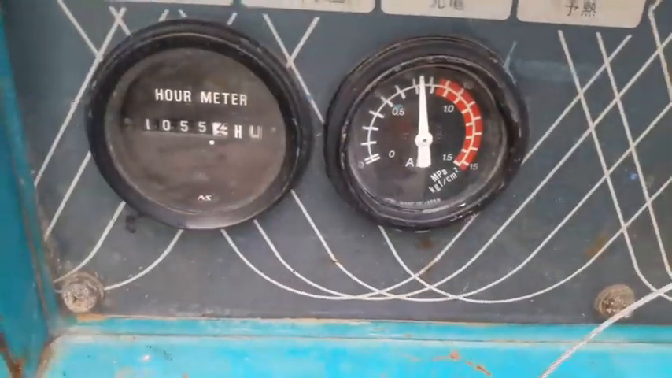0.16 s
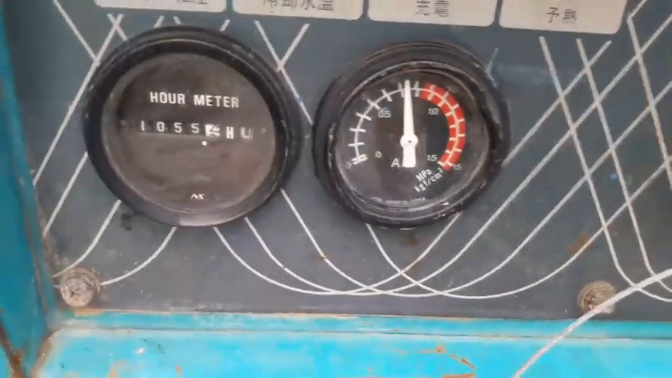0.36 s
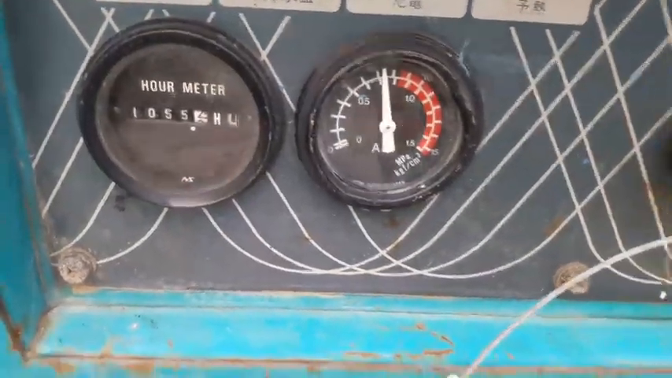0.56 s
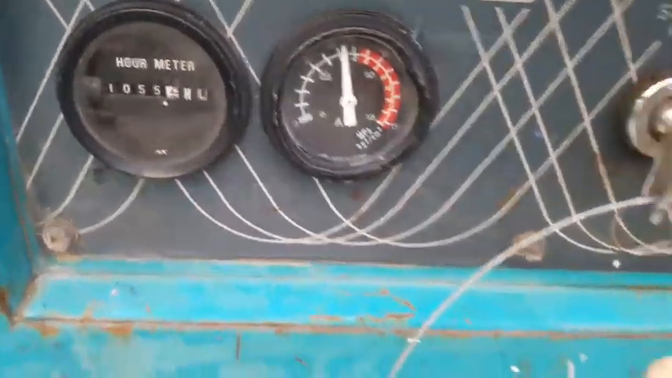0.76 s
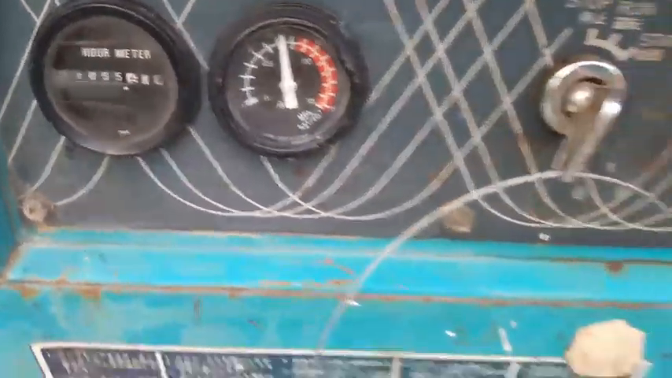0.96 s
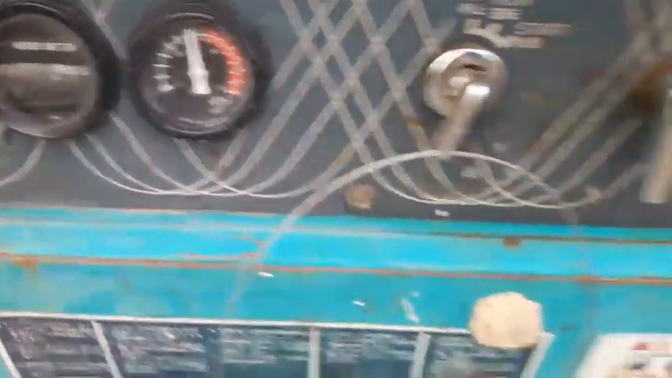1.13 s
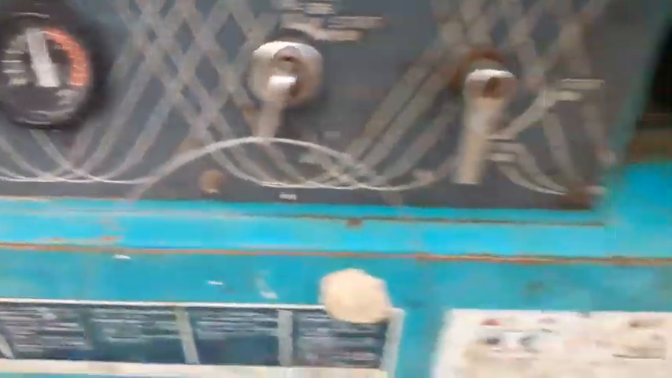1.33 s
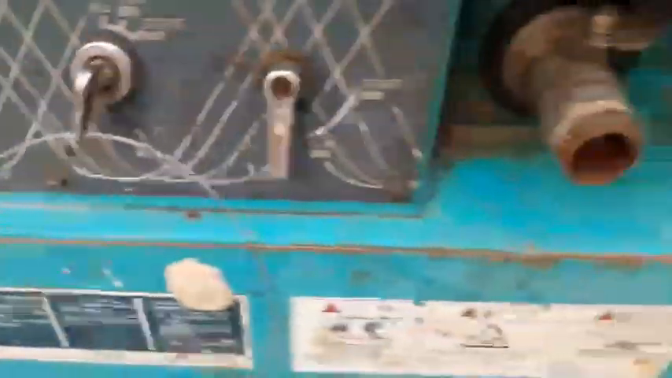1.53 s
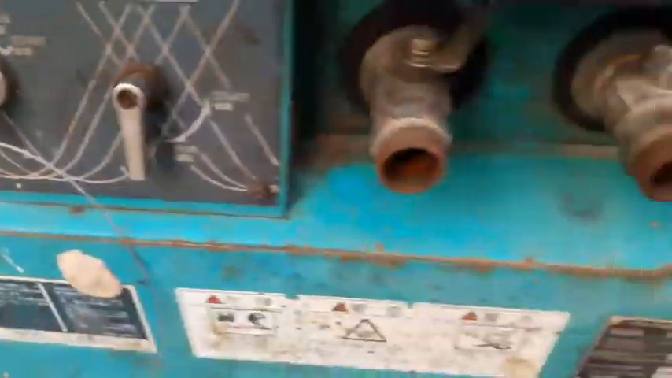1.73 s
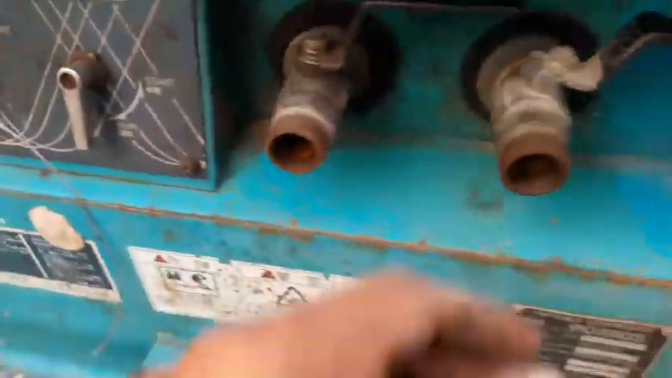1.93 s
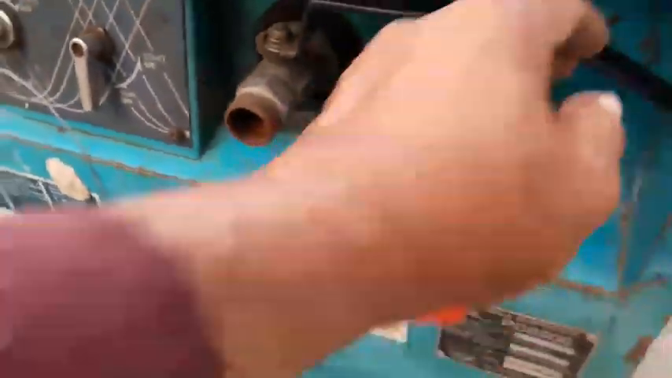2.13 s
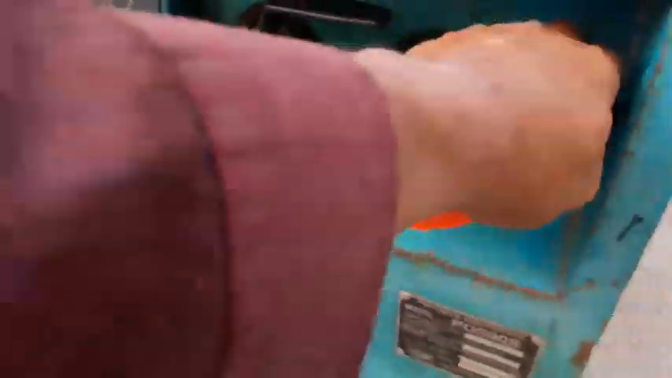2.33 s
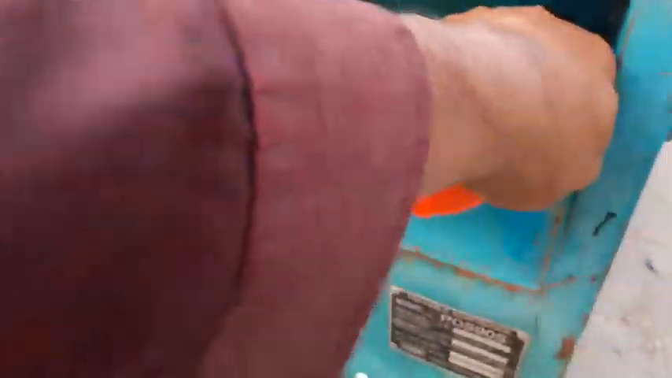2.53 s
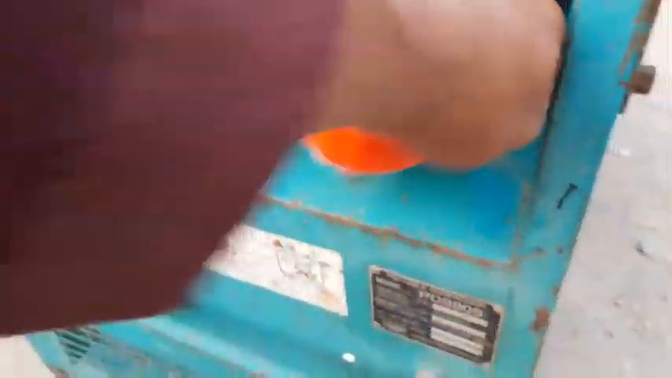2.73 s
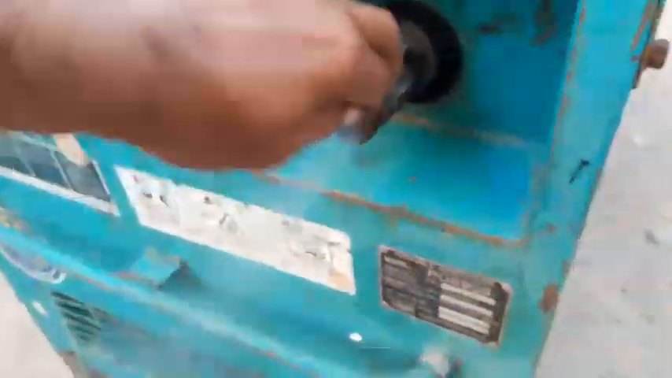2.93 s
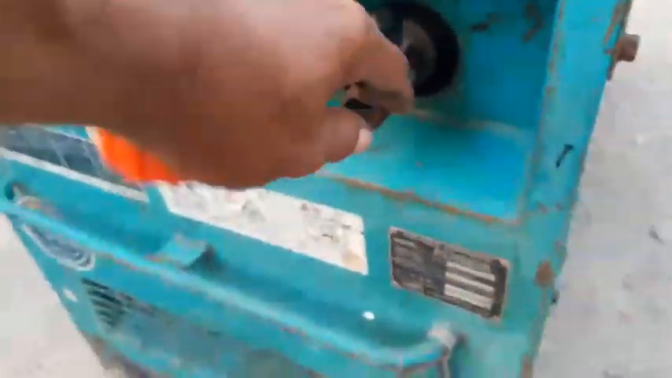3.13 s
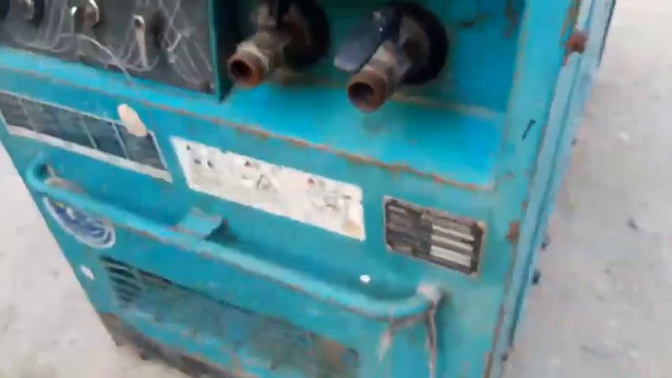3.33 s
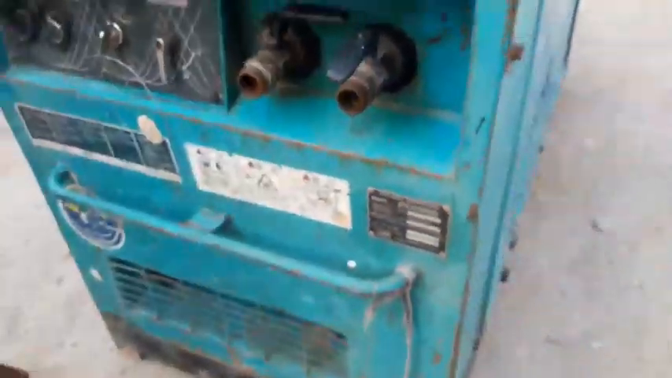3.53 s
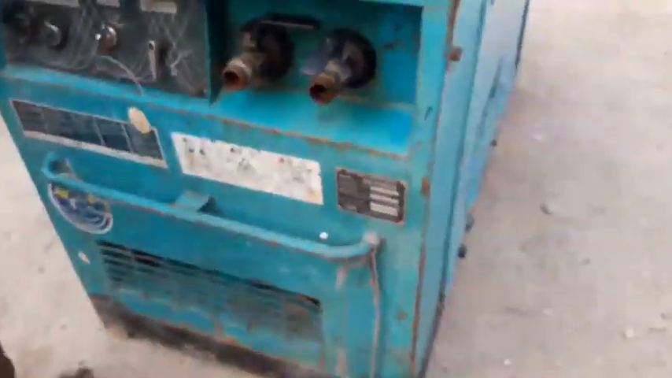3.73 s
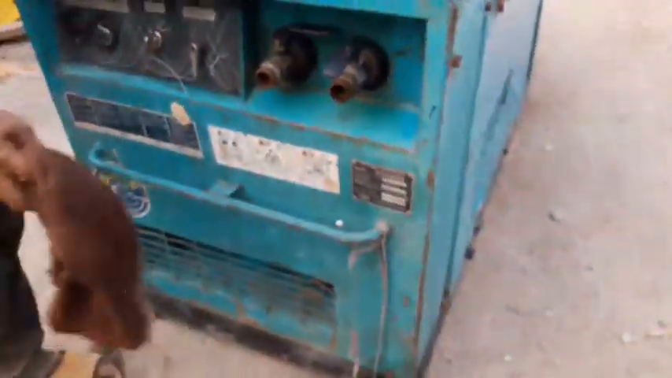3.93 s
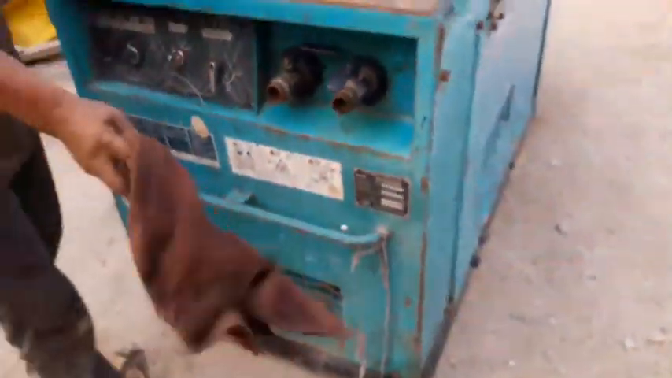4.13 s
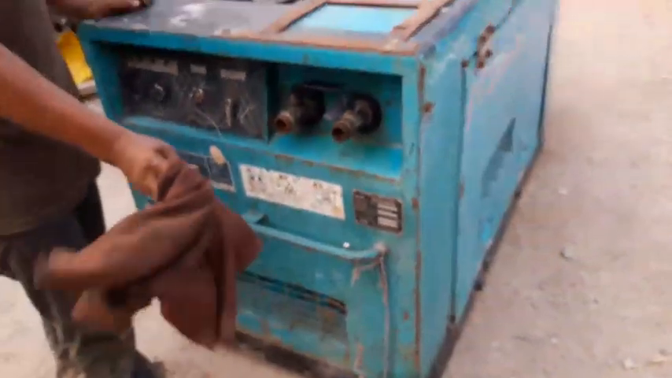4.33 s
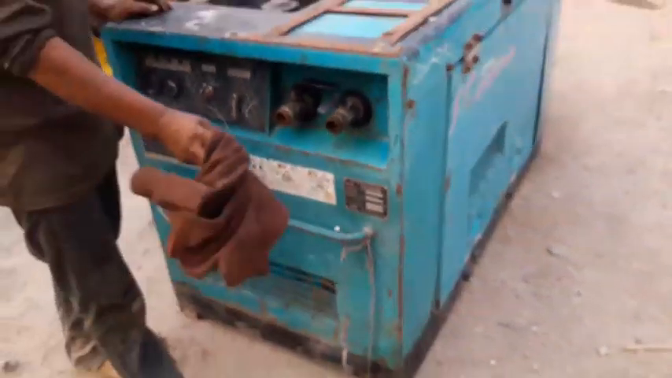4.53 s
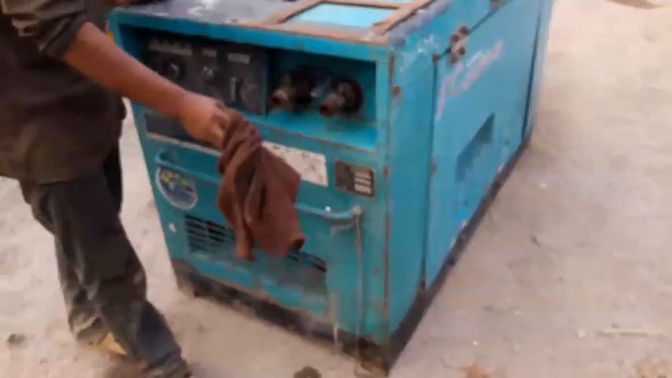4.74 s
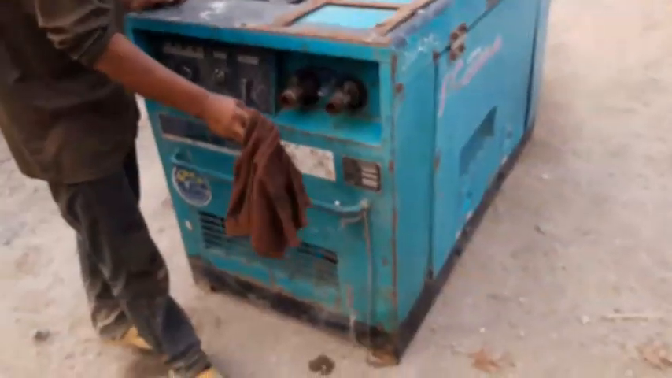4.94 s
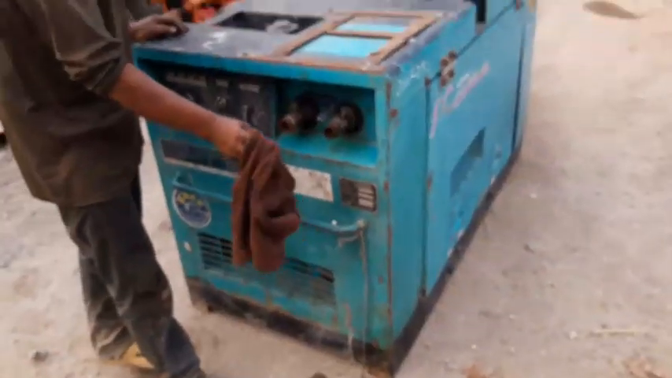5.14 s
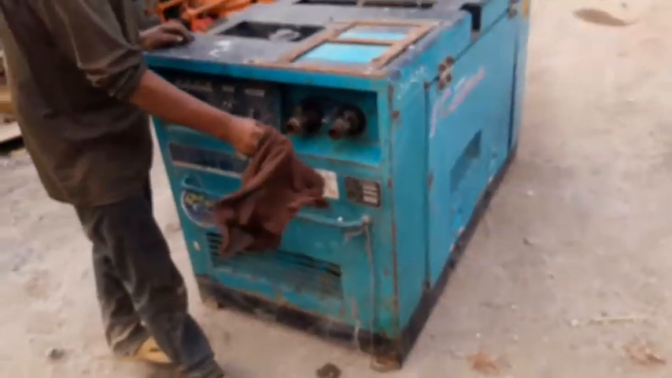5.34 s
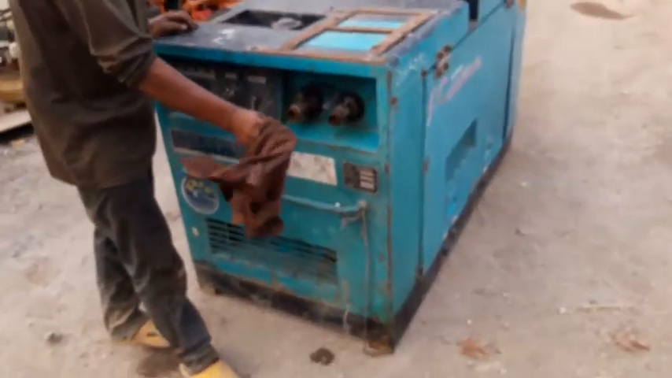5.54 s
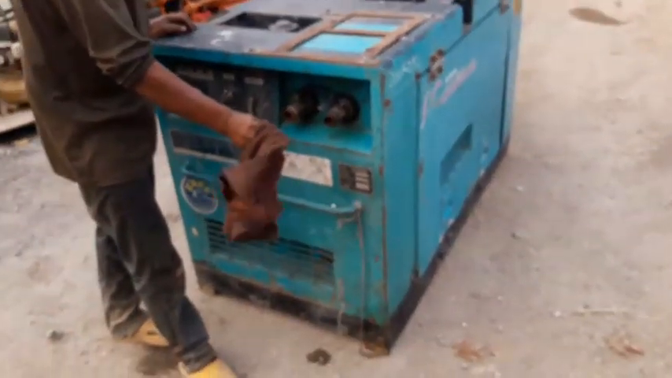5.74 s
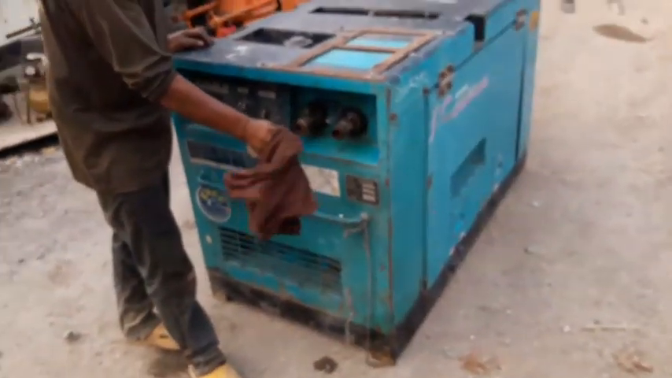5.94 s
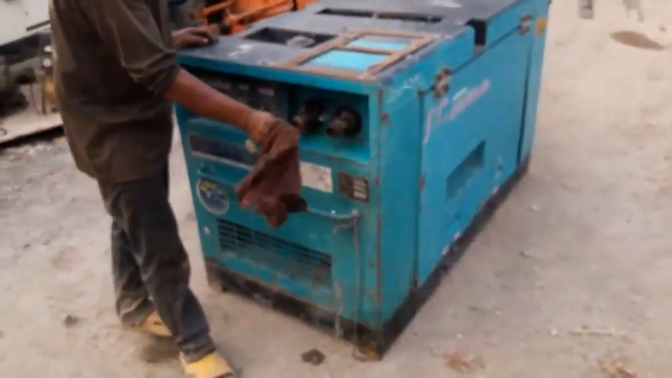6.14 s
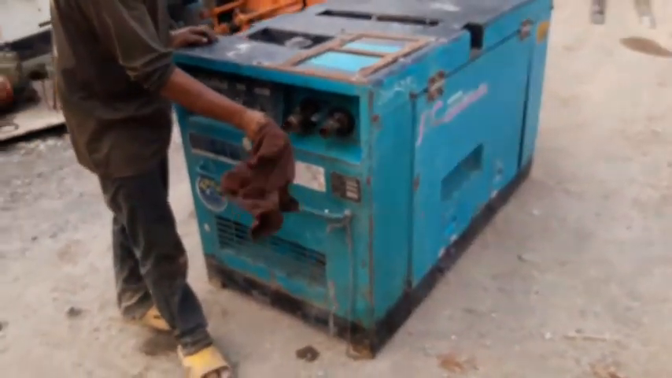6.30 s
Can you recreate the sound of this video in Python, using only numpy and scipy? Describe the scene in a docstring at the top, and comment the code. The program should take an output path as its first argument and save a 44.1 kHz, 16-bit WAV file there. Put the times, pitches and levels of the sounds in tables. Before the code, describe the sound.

Outdoors, a hand-held microphone close to a small diesel compressor: low, fast, throbbing idle with metallic clatter and growling panels. A few light scuffs come near the valves, then a short thin hiss. At about three seconds a valve opens and a loud broadband air jet takes over abruptly, pulsing rapidly with the engine, its tone dulling as the microphone backs away.

```python
"""A three-cylinder diesel compressor idles outdoors, close to a hand-held microphone: tones locked to the
engine cycle, ringing casing and block, clatter and rumble of filtered noise. Scuffs near the air valves and
a short seep of air come before a valve is thrown open. The idle drops away abruptly as the jet starts, noise
that throbs with each firing; the engine runs faster under load, with two exhaust tones, gritty valve gear
and a squeak per firing from a small leak. The microphone backs away, which changes the colour of the jet."""
import sys
import numpy as np
from scipy import signal
from scipy.io import wavfile
from scipy.ndimage import uniform_filter1d

SR = 44100
rng = np.random.default_rng(int(sys.argv[2]) if len(sys.argv) > 2 else 0)


def digitize_waveform(pressure):
    """Quantize a signal to 16-bit integers and store it at the path in sys.argv[1].

    Rows of a 2-D input are taken as channels; values are limited to [-1, 1].
    """
    field = np.atleast_2d(pressure).T
    bounded = np.clip(field, -1, 1)
    quanta = np.round(bounded * 32767).astype(np.int16)
    wavfile.write(sys.argv[1], SR, quanta)


N = 280917

# Levels inside a table of tones, modes or noise colour are relative: each layer is levelled afterwards.
# Exhaust at idle, multiples of three are the firings: cycle_multiple, level_db
EXHAUST_TONES = [(3, -49.5), (4, -38), (6, 0.5), (7, -39), (8, -32), (9, -2.5), (10, -36), (11, -30.5),
                 (12, -17.5), (13, -31), (14, -38.5), (15, -13), (16, -24.5), (17, -23), (18, -27),
                 (19, -23), (21, -17.5), (23, -34), (24, -31.5), (25, -24.5), (27, -24.5), (28, -28),
                 (29, -33.5), (30, -28.5), (31, -32.5), (32, -34.5), (33, -38.5), (34, -34), (36, -28),
                 (38, -34), (39, -37.5), (42, -26.5), (43, -37.5), (44, -39), (45, -29)]
# Fan and casing: frequency_hz, density_db_per_hz
RUMBLE_COLOUR = [(15, -58), (25, -18.5), (48, -23.5), (94, -7.5), (134, -16.5), (162, -8.5), (202, -12.5),
                 (394, -19), (565, -17.5), (648, -21.5), (1500, -34), (1950, -73.5), (3300, -120)]
# Panels that growl: pitch_hz (before the cylinder's factor), level_db, t60_s, change_db towards the valves
CASING_MODES = [(561, -2.5, 0.047, 1.5), (698, 3.5, 0.076, -10.5), (853, 0.5, 0.075, 0),
                (979, 0, 0.044, -2.5), (1106, -6, .04, -1)]
# Block rung by combustion: pitch_hz (before the cylinder's factor), level_db, t60_s, change_db to the valves
BLOCK_MODES = [(1725, 0, .034, 1.5), (1900, -16, .03, 3), (2050, -15, .03, 3), (3480, -10, .035, 1.5),
               (3900, -15, .025, 1.5)]
# Valve gear and injectors: frequency_hz, density_db_per_hz
CLATTER_COLOUR = [(600, -30), (950, -13), (1270, -17), (1700, -10.5), (2050, -16.5), (2300, -21.5),
                  (3000, -22), (3700, -17), (4600, -29), (5500, -30), (7060, -18.5), (7480, -24),
                  (8020, -37.5), (9760, -42), (14300, -48)]
# One row a cylinder: growl_db, knock_db, clatter_db, pitch_factor of what rings
CYLINDERS = [(-1, -9, 2, 1.03), (0, 0, 4, 1.015), (0, 0, 4, .975)]
# The microphone moves along the machine: time_s, place (0 at the gauges, 1 at the valves)
PLACE = [(0, 0.01), (1.2, 0.15), (1.9, 0.39), (2.5, 1), (2.95, 1.2)]
# Rows exhaust, upper firing tones, tones between them, rumble, growl, knock, clatter:
# at_gauges_db, at_valves_db
IDLE_LEVELS = [(-7.5, -7.1), (2.5, 1.4), (1.1, 5.5), (-27, -32.5), (-34, -37), (-38.5, -36), (-38.5, -34)]
# Short scuffs and rattles near the valves: start_s, level_db (before the soft start)
SCUFF_TIMES = [(0.5881, -34), (0.8205, -35), (1.278, -32), (1.8183, -32), (1.9366, -24.5), (1.9694, -37),
               (2.0477, -34), (2.2463, -23.5), (2.5436, -32), (2.585, -28), (2.6204, -28), (2.6983, -27.5),
               (2.7414, -24), (2.8519, -28)]
# Scuffs: frequency_hz, density_db_per_hz
SCUFF_COLOUR = [(880, -40), (1500, -18.5), (1830, -8.5), (2400, -9), (3510, -3), (4650, -16.5), (6980, 0.5),
                (8200, -23), (12300, -42), (14300, -46.5)]
# Air seeping out: frequency_hz, density_db_per_hz
SEEP_COLOUR = [(2000, -40), (3500, 8), (5000, -7), (7000, 5), (8200, -12), (11000, -16), (14300, -20)]
# Jet before throb and gusts: time_s, level_db
JET_LEVEL = [(2.95, -11), (3.0, -13), (3.07, -13), (3.3, -15), (3.6, -13.5), (4.3, -12), (4.7, -12.9),
             (5.3, -13), (5.72, -13), (6.0, -12.8), (6.37, -13.5)]
# Jet close by: frequency_hz, density_db_per_hz
NEAR_COLOUR = [(25, -45), (60, -13), (140, 3), (320, 2), (800, 2), (2300, 1), (4500, -4), (6000, -7),
               (7200, -4.5), (8050, -14), (9200, -8), (10700, -6.5), (12500, -2.5), (14250, -7.5)]
# Jet from further off: frequency_hz, density_db_per_hz
FAR_COLOUR = [(25, -44), (60, -18), (140, -1), (600, -1), (2500, -4.5), (4500, -7.5), (5800, -13),
              (6900, -8), (7400, -9), (8100, -18.5), (9600, -9.5), (11000, -16), (13300, -14.5),
              (14250, -13.5)]
# The microphone backs away: time_s, colour (0 near, 1 far)
AWAY = [(2.95, 0.6), (3.1, 0), (3.45, 0.15), (3.7, 0.38), (4.3, 0.85), (5.4, 1), (6.37, 0.83)]
# Engine speed under load: time_s, firings_per_s
LOAD_SPEED = [(3.3, 84), (3.7, 90.7), (3.85, 92.8), (4.15, 93.9), (4.75, 92.9), (5.05, 92), (5.65, 88),
              (6.37, 85.5)]
# Valve gear under load: frequency_hz, density_db_per_hz
GRIT_COLOUR = [(5500, -9.5), (6300, -0.5), (7300, 0), (7900, -28)]
# Width between the two channels: frequency_hz, side_below_mid_db
STEREO_WIDTH = [(3300, -90), (4200, -12), (5500, -9), (7000, -9), (9700, -11), (11500, -5), (14300, -5)]

CYCLE_HZ, CYCLE_START = 12.9713, .0675  # engine cycles a second at idle, cycle position at time zero
KNOCK_RISE_S, KNOCK_LATE_S = .006, .002
SHADE_S, SHADE_DB_PER_S = 2.42, 25  # an arm comes between the block and the microphone
OPEN_S = 2.9525  # the valve opens
FADE_S, FADE_DB = .024, -9  # short fade of the idle, ending as the jet starts
SCUFF_T60_S = .064
# air seeps as the handle starts to turn
SEEP_S, SEEP_DB, SEEP_RISE_DB_PER_S, SEEP_FALL_DB_PER_S = 2.827, -34.5, 91, 130
BITE_NEAR_DB, BITE_FAR_DB = 1, -.85  # the jet around 4.5 kHz
LOAD_S, LOAD_RISE_S, LOAD_FROM_DB, LOAD_DB = 3.55, .4, -47, -31.5  # the engine takes the load
SQUEAK_HZ = 9726  # middle of the glide, before each squeak's own chance
SQUEAK_S, SQUEAK_RISE_DB_PER_S, SQUEAK_DB = 3.7, 170, -24
SQUEAK_FADE_S, SQUEAK_FADE_DB_PER_S = 4.97, 15
UNEVEN_DB, UNEVEN_PER_DB = 3.5, .8  # squeaks differ more from each other as they fade
EDGE_HZ = 14330  # upper band limit


def gain_of(db):
    """Amplitude factor of a level in dB."""
    return 10 ** (np.asarray(db) / 20)


def evened(x):
    """The signal at rms 1."""
    return x / np.sqrt(np.mean(x ** 2) + 1e-20)


def read(points, hz):
    """A colour table read along a logarithmic frequency axis."""
    f, value = np.transpose(points)
    return np.interp(np.log(hz + 1), np.log(f + 1), value)


def columns(rows, t):
    """Every column after the first, read at the times t."""
    s, *rest = np.transpose(rows)
    return [np.interp(t, s, c) for c in rest]


def ramp(t, start_s, length_s):
    """Straight rise from 0 to 1."""
    return np.clip((t - start_s) / length_s, 0, 1)


def wander(hz):
    """Slow chance: straight lines between normal random knots, hz knots a second."""
    knots = rng.standard_normal(int(N / SR * 40) + 4)
    return np.interp(np.arange(N) / SR * np.clip(hz, .1, 40), np.arange(len(knots)), knots)


def noise(colour_db, patchy_db):
    """Random short-time spectra; colour_db(hz, t) gives the shape, patches drift over it."""
    frames, hz = N // 256 + 5, np.fft.rfftfreq(1024, 1 / SR)
    real, imaginary, patches = rng.standard_normal((frames, 513, 3)).T
    patches = uniform_filter1d(patches, size=12, axis=0)
    patches = evened(uniform_filter1d(patches, size=10, axis=1))
    times = np.arange(frames) * 256 / SR
    shape = gain_of(colour_db(hz[:, None], times) + np.zeros(frames))
    shape = shape / np.sqrt((shape ** 2).mean(0))
    spectra = (real + 1j * imaginary) * shape * gain_of(patchy_db * patches)
    return evened(signal.istft(spectra, nperseg=1024, noverlap=768)[1][:N])


def steady_noise(colour, patchy_db):
    """Noise that keeps the colour of one table."""
    return noise(lambda hz, s: read(colour, hz), patchy_db)


def idle_exhaust(cycle, upper_db, between_db):
    """Exhaust pulses as a row of tones at multiples of the cycle rate; the upper ones waver."""
    tones = np.zeros(N)
    for k, db in EXHAUST_TONES:
        between = k % 3 > 0
        late = .4 * max(k - 9, 0)  # upper tones trail the pressure peak through the silencer
        late += 2 * np.pi * rng.random() * between  # tones between the firings keep no common peak
        waver_db = np.clip((k - 5) / 12, 0, 1) * 1.88 * wander(5.0)
        place_db = (between_db if between else upper_db) * (k > 9)
        phase = 2 * np.pi * k * cycle - late + .06 * waver_db
        tones += gain_of(db + waver_db + place_db) * np.cos(phase)
    return evened(tones)


def rumble():
    """Fan and casing as low, steady noise."""
    return steady_noise(RUMBLE_COLOUR, .37)


def struck(modes, blows, cylinder, rise_s, place):
    """Every blow rings the same decaying modes with a soft start, each cylinder at its own pitch."""
    t, out = np.arange(5000) / SR, np.zeros(N)
    for hz, db, t60, change_db in modes:
        for k, (*_, pitch) in enumerate(CYLINDERS):
            ring = gain_of(db - 60 * t / t60) * np.sin(2 * np.pi * hz * pitch * t)
            ring *= 1 - np.exp(-t / rise_s)
            rung = signal.oaconvolve(blows * (cylinder == k), ring)[:N]
            out += gain_of(change_db * place) * rung
    return evened(out)


def growl(fires, cylinder, blow_db, place):
    """Casing panels rung by each firing."""
    return struck(CASING_MODES, fires * gain_of(blow_db), cylinder, .0043, place)


def knock(fires, cylinder, blow_db, place):
    """Engine block rung by combustion, a little after each firing."""
    rung = struck(BLOCK_MODES, fires * gain_of(blow_db), cylinder, KNOCK_RISE_S, place)
    return np.roll(rung, round(KNOCK_LATE_S * SR))


def clatter(cycle, burst_db):
    """Valve gear and injectors: steady noise with a decaying burst per firing."""
    since = (3 * cycle + .15) % 1  # combustion is heard a little before the pressure peak
    burst = gain_of(burst_db) * np.minimum(since / .25, 1) * np.exp(-since / .56)
    return evened((.41 + burst) * steady_noise(CLATTER_COLOUR, .89))


def idle():
    """The idling engine, its layers locked to the cycle except the rumble; it drops away as the jet starts."""
    t = np.arange(N) / SR
    place, = columns(PLACE, t)
    exhaust_db, upper_db, between_db, rumble_db, growl_db, knock_db, clatter_db = (
        gauges + (valves - gauges) * place for gauges, valves in IDLE_LEVELS)
    cycle = CYCLE_START + CYCLE_HZ * t
    firing = np.floor(3 * cycle + .1197).astype(int)
    fires = np.diff(firing, prepend=0) > 0
    cylinder = firing % 3
    growl_by, knock_by, clatter_by, _ = np.transpose(CYLINDERS)[:, cylinder]
    luck = rng.standard_normal((firing[-1] + 1, 3))[firing].T  # no two firings are alike
    shade_db = SHADE_DB_PER_S * np.maximum(t - SHADE_S, 0)
    mix = gain_of(exhaust_db) * idle_exhaust(cycle, upper_db, between_db)
    mix += gain_of(rumble_db) * rumble()
    mix += gain_of(growl_db) * growl(fires, cylinder, growl_by + 2.8 * luck[0], place)
    mix += gain_of(knock_db - shade_db) * knock(fires, cylinder, knock_by + .98 * luck[1], place)
    mix += gain_of(clatter_db) * clatter(cycle, clatter_by + 2.9 * luck[2])
    drop_db = FADE_DB * ramp(t, OPEN_S - FADE_S, FADE_S)
    drop_db -= 27 * ramp(t, OPEN_S, .003) + 40 * ramp(t, OPEN_S, .4)
    return gain_of(drop_db) * mix


def scuffs():
    """Scuffs and rattles near the valves: noise with a quick rise and a decay, until the valve opens."""
    t, shape = np.arange(N) / SR, np.zeros(N)
    for start_s, db in SCUFF_TIMES:
        after = np.maximum(t - start_s, 0)
        shape += gain_of(db - 60 * after / SCUFF_T60_S) * np.minimum(after / .0042, 1)
    return shape * steady_noise(SCUFF_COLOUR, 3.8) * (t < OPEN_S)


def seep():
    """First air through the barely turned valve: a hiss that swells and sinks."""
    t = np.arange(N) / SR
    below_db = np.maximum(SEEP_RISE_DB_PER_S * (SEEP_S - t), SEEP_FALL_DB_PER_S * (t - SEEP_S))
    return gain_of(SEEP_DB - below_db) * steady_noise(SEEP_COLOUR, 1.5) * (t < OPEN_S)


def jet_colour(hz, s):
    """The spectrum of the jet in dB, between its near and far colour."""
    away, = columns(AWAY, s)
    bite_db = BITE_NEAR_DB + away * (BITE_FAR_DB - BITE_NEAR_DB)
    bite = np.exp(-np.log(hz / 4500 + 1e-9) ** 2 / .22) * bite_db
    near = read(NEAR_COLOUR, hz)
    return near + away * (read(FAR_COLOUR, hz) - near) + bite


def jet(turns):
    """Turbulent air as noise, gusting by chance and throbbing with each firing."""
    t = np.arange(N) / SR
    throb_db = 1.44 * ramp(t, 3.4, .14) * np.cos(2 * np.pi * (turns - .3))
    gusts_db = .37 * wander(14) + .7 * wander(35)
    return gain_of(columns(JET_LEVEL, t)[0] + throb_db + gusts_db) * noise(jet_colour, .72)


def loaded_exhaust(turns, level_db):
    """Fast exhaust: a tone at the firing rate and a wavering octave above it."""
    octave = gain_of(-5.5 + .99 * wander(7.7)) * np.cos(4 * np.pi * turns)
    tones = np.sqrt(2) * (np.cos(2 * np.pi * turns) + octave)
    return gain_of(level_db + .93 * wander(5.9)) * tones


def grit(turns, level_db, tap_luck):
    """Valve gear under load: noise in one uneven tap per firing."""
    taps = np.sin(np.pi * turns) ** 2 * gain_of(6.6 * np.minimum(tap_luck, 1.5))
    return gain_of(level_db + 4) * evened(taps * steady_noise(GRIT_COLOUR, .9))


def squeak(turns, size, pitch, start):
    """A small leak whistles once per firing, gliding up, each squeak with its own size and pitch."""
    t = np.arange(N) / SR
    faded_db = SQUEAK_FADE_DB_PER_S * np.maximum(t - SQUEAK_FADE_S, 0)
    level_db = SQUEAK_DB - faded_db - SQUEAK_RISE_DB_PER_S * np.maximum(SQUEAK_S - t, 0)
    uneven_db = UNEVEN_DB + UNEVEN_PER_DB * faded_db
    since = turns % 1 - .5
    glide_hz = SQUEAK_HZ * (1 + .012 * pitch + .1155 * since)  # rises as the pressure builds
    tone = np.cos(2 * np.pi * np.cumsum(glide_hz) / SR + np.pi * start)
    blip = np.exp(-(since / .19) ** 2) * tone
    return evened(blip) * gain_of(level_db + uneven_db * (np.minimum(size, 1.2) - .13))


def loaded():
    """All that starts with the open valve: jet, fast exhaust, grit and squeak, on one count of firings."""
    t = np.arange(N) / SR
    turns = np.cumsum(columns(LOAD_SPEED, t)[0]) / SR  # firings so far
    size, pitch, start = rng.standard_normal((int(turns[-1]) + 1, 3))[turns.astype(int)].T
    exhaust_db = LOAD_FROM_DB + (LOAD_DB - LOAD_FROM_DB) * ramp(t, LOAD_S, LOAD_RISE_S)
    mix = jet(turns) + loaded_exhaust(turns, exhaust_db)
    mix += grit(turns, exhaust_db, start) + squeak(turns, size, pitch, start)
    return ramp(t, OPEN_S - .0015, .0054) ** 2 * mix


def scene():
    """The idle, the hand at the valve and the blast, the same in both channels."""
    mono = idle() + scuffs() + seep() + loaded()
    return np.array([mono, mono])


def record(dry):
    """Deep bass is lost, peaks are softly squeezed, the channels part in the treble; then the band limit."""
    squeezed = 1.1 * np.tanh(dry[0] / 1.1)
    bass_cut = signal.butter(2, 35, "high", fs=SR, output="sos")
    mid = signal.sosfiltfilt(bass_cut, squeezed, padtype="even", padlen=8000)
    hz, _, spectra = signal.stft(mid, SR, nperseg=256)
    scatter = np.exp(2j * np.pi * rng.random(spectra.T.shape).T)
    scattered = spectra * scatter * gain_of(read(STEREO_WIDTH, hz))[:, None]
    # scattered frames add in power, so the side needs the root of two
    side = np.sqrt(2) * signal.istft(scattered, SR, nperseg=256)[1][:N]
    band = signal.firwin(1535, EDGE_HZ, window=("kaiser", 9), fs=SR)[None]
    return signal.oaconvolve([mid + side, mid - side], band, "same")


dry = scene()
out = record(dry)
digitize_waveform(out)
```